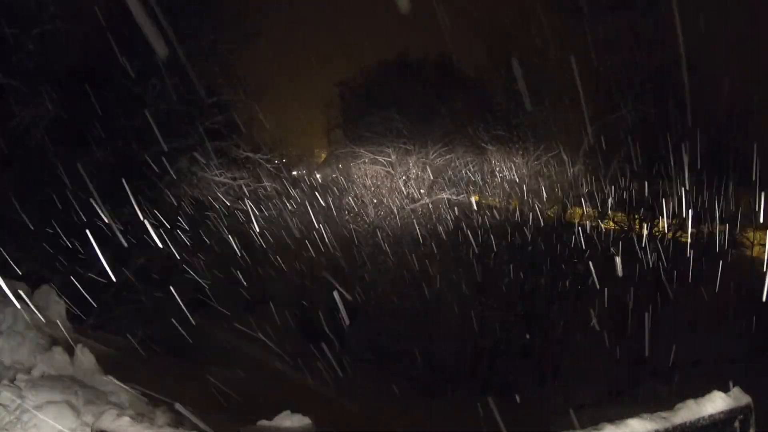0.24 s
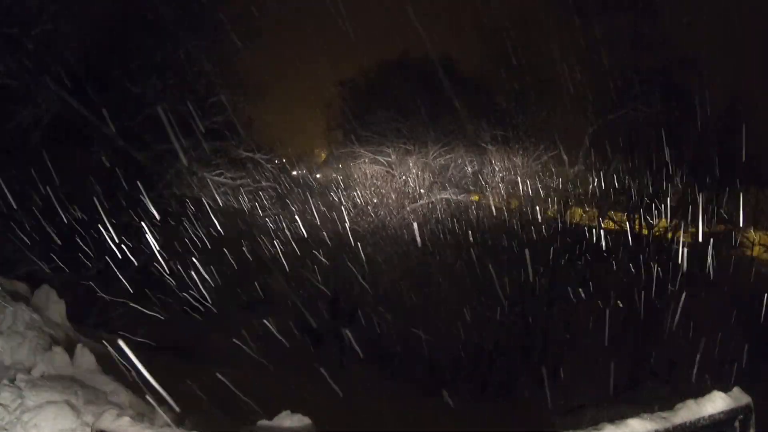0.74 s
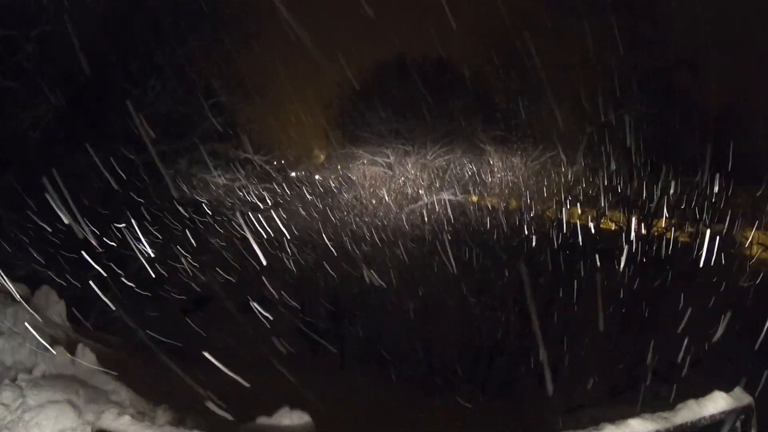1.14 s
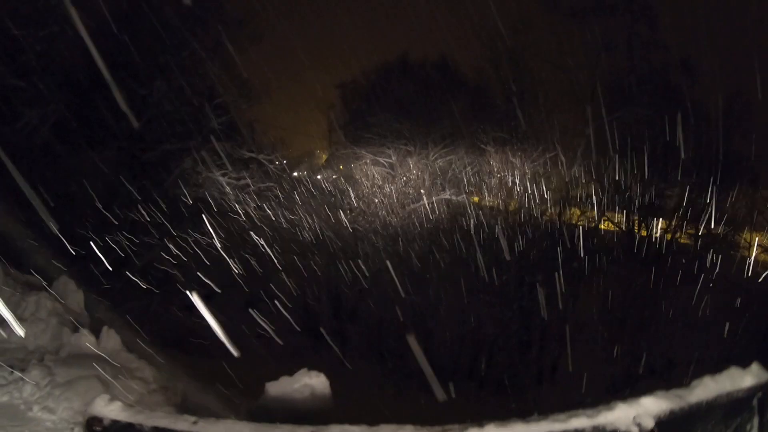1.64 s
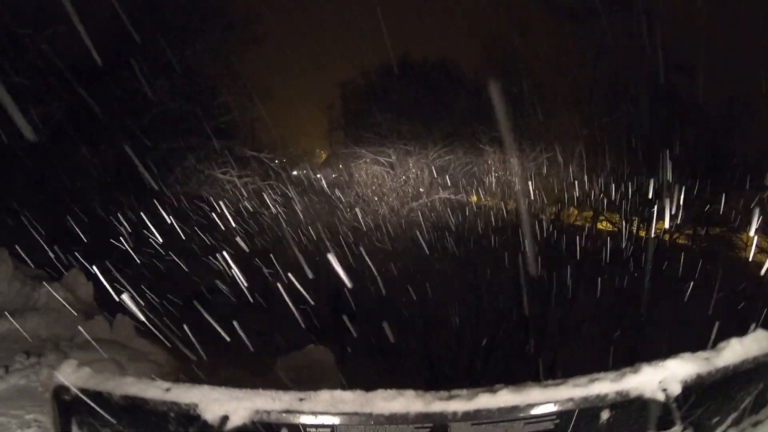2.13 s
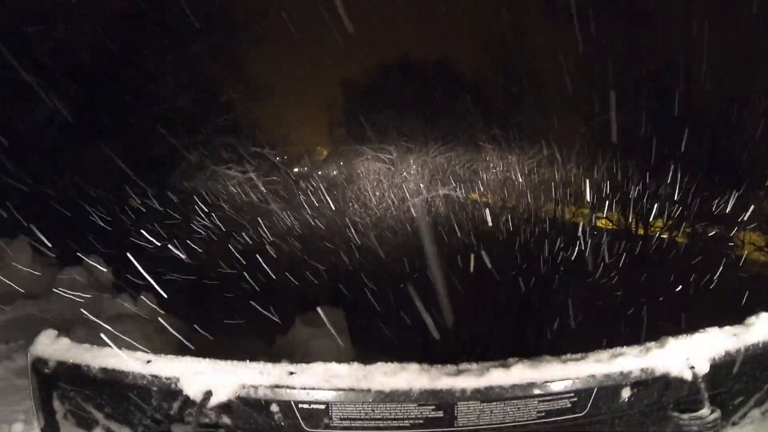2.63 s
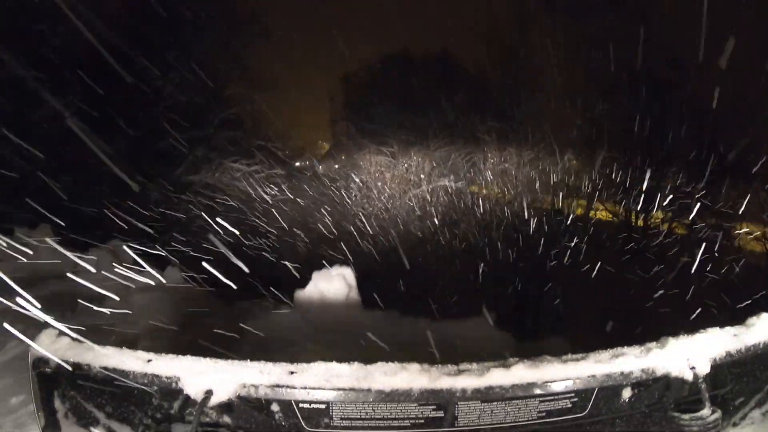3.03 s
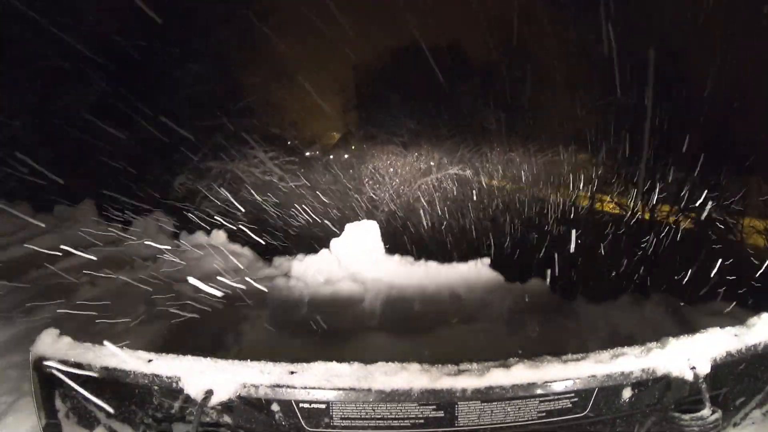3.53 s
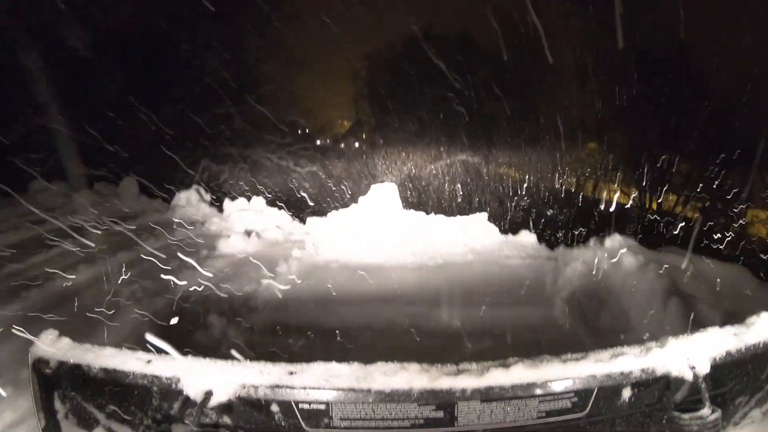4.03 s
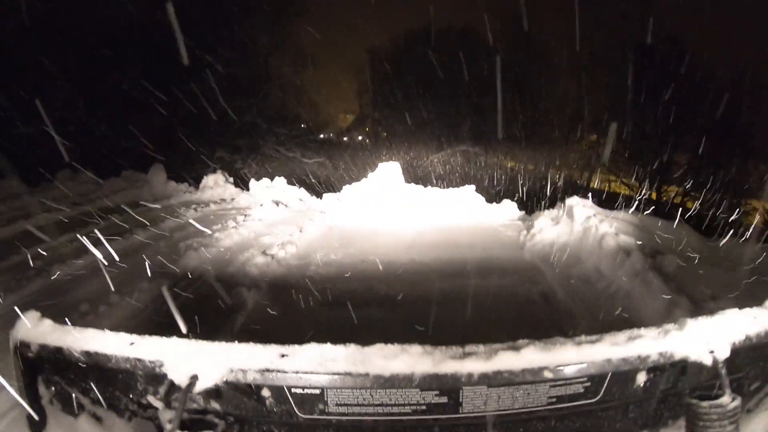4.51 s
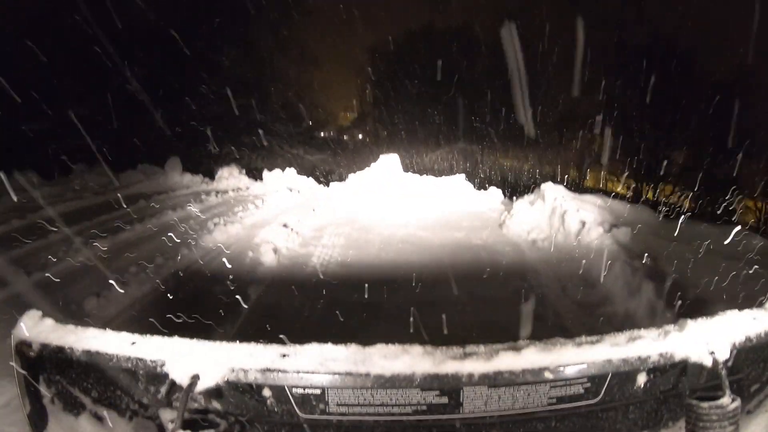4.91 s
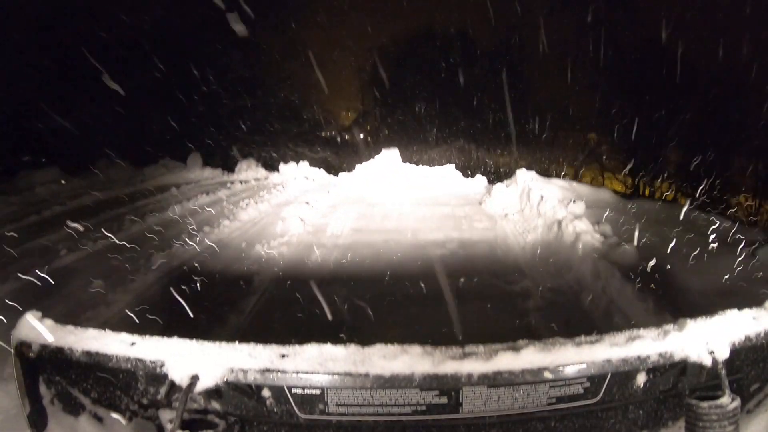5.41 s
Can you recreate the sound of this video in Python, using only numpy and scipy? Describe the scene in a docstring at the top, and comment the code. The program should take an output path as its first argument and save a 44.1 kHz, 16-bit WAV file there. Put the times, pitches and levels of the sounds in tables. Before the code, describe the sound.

Outdoors on a snow plough quad, heard from a boxed-in microphone on the frame: low chugging idle, a cluster of metallic gear knocks, a fluttering winch whine with airy hiss that stops in a clack, dull frame clunks, then quickening engine throb with fizzy rattling and one more short winch burst and clack.

```python
"""A single-cylinder four-stroke quad idles as overtones of its firing rate, then knocks into gear.
An electric winch lifts the plough blade, hissing and whining, until relay and brake clack; clunks follow.
The quad backs away from a snow bank, its rate rising; a loose part buzzes with the crank in two bursts.
During the first the winch lifts and clacks again. Panels rumble and valve gear clatters throughout.
The microphone sits in a closed housing on the frame: strong bass, dull treble."""
import sys
import numpy as np
from scipy import signal
from scipy.fft import rfft, irfft, next_fast_len
from scipy.io import wavfile
from scipy.ndimage import uniform_filter1d, map_coordinates

SR = 44100
rng = np.random.default_rng(int(sys.argv[2]) if len(sys.argv) > 2 else 0)


def master(y):
    """Save y as 16-bit WAV."""
    cut = np.clip(np.atleast_2d(y).T, -1, 1)
    pcm = np.round(cut * 32767)  # scale
    wavfile.write(sys.argv[1], SR, pcm.astype(np.int16))


def decibels_to_gain(level_db):
    """Convert a level in decibels to a linear amplitude gain (20 dB per decade)."""
    exponent = np.asarray(level_db, float) / 20
    return 10 ** exponent


N = 249606
TIME = np.arange(N) / SR

# Engine speed, one firing per cycle [start_s, firings_per_s]
ENGINE_SPEED = [(0, 10.38), (.59, 10.51), (.79, 12.22), (.9, 17.09), (1.06, 16.9), (1.49, 14.42),
                (1.62, 13.48), (1.7, 14.13), (2.72, 14.78), (2.99, 18.25), (3.42, 21.58), (3.62, 21.75),
                (3.96, 23.49), (4.39, 23.34), (4.48, 22.47), (4.91, 23.79), (5.13, 26.25), (5.66, 28.36)]
# Rumble of the panels, before a common lift [start_s, level_db]
RUMBLE_LEVEL = [(0, -44), (.6, -42), (1.15, -37), (1.28, -27.5), (1.395, -36.5), (1.45, -27.5),
                (1.69, -32.5), (2.33, -35.5), (2.61, -32.5), (2.9, -41), (3.4, -38), (3.88, -36),
                (4.35, -45.5), (4.8, -45), (5.1, -41.5), (5.66, -43.5)]
# Spectrum of the panel rumble [pitch_hz, density_db_per_hz]
RUMBLE_SPECTRUM = [(20, -19.5), (50, 14), (120, 6), (165, 1.5), (260, 0.5), (290, -8), (500, -8.5),
                   (800, -35), (3000, -110)]
# Spectrum of the valve-gear clatter [pitch_hz, density_db_per_hz]
CLATTER_SPECTRUM = [(240, -5), (400, -3.5), (620, -4), (1050, -5.5), (1360, -13.5), (1700, -10),
                    (2200, -13.5), (2900, -27), (4100, -21.5), (5800, -23.5), (7000, -38), (8500, -41),
                    (14000, -93.5)]
# Modes of the valve cover, rung when a valve seats [pitch_hz, width_hz, level_db]
COVER_MODES = [(1079, 18, 5), (1520, 220, -3.5), (2080, 210, -4.5), (2530, 210, -10)]
# Bursts of buzz from the loose part [start_s, stop_s, level_db]
BUZZ_BURSTS = [(4.31, 4.55, -47), (4.7, 5.66, -48)]
# Contacts of the loose part in each crank turn; it strikes earlier in every second turn and in the
# first burst [share_turns, level_db, alternate_advance_turns, first_burst_advance_turns]
BUZZ_CONTACTS = [(0.34, -9.5, 0.027, .03), (.48, -18.5, 0.0048, 0.065), (.98, -11.5, 0.044, 0.11)]
# Spectrum of one tick of the loose part [pitch_hz, density_db]
TICK_SPECTRUM = [(1650, -2), (3300, -11.5), (4300, 0.5), (5400, -4), (6200, 3.5), (7000, -10),
                 (8500, -12.5), (9800, -18.5), (12000, -38), (15000, -50.5)]
# Brief dips of the buzz [centre_s, half_length_s, depth_db]
BUZZ_LULLS = [(4.87, 0.0075, -14), (5.268, 0.013, -7.5)]
# Gear-lever knocks and frame clunks, levels before trims; the thud decays more slowly than its t60 by a
# common factor [start_s, crack_level_db, thud_over_crack_db, t60_s, thud_pitch_hz]
BLOWS = [(0.7385, -47, 15.5, 0.17, 1034), (0.797, -45, 16.5, 0.13, 1655), (0.95, -37.5, 10.5, 0.043, 565),
         (1.012, -41, 14, 0.065, 875), (1.19, -42, 3.5, 0.91, 528), (1.229, -32, 7.5, 0.04, 1200),
         (1.268, -39, 19.5, 0.032, 490), (1.285, -21, -4, 0.048, 1820), (1.294, -25, 2, 0.057, 1200),
         (1.306, -32, 3.5, 0.17, 460), (1.338, -23.5, 0, 0.047, 624), (1.345, -29.5, -7, 0.19, 2500),
         (1.377, -46.5, 24, 0.022, 297), (1.408, -25.5, -18, 0.3, 2480), (1.4202, -24.5, 4.5, 0.067, 590),
         (1.429, -41, 13, 0.036, 1780), (1.44, -44, 20, 0.042, 610), (2.5649, -38, 8.5, 0.097, 440),
         (2.579, -35, 0, 0.026, 1490), (2.5935, -33, 12, 0.14, 788), (2.6145, -37.5, 12, 0.06, 1860),
         (2.677, -40, 14, 0.13, 453), (2.7089, -38.5, 11, 0.078, 454), (2.7827, -36, 3.5, 0.055, 1470),
         (2.8668, -44.5, 17, 0.089, 1920), (3.129, -39, -5.5, 0.066, 500), (3.483, -37.5, 2, 0.062, 554),
         (3.7774, -39, -13, 0.19, 484), (3.8419, -35, 9, 0.14, 2090), (4.3508, -23.5, -9, 0.029, 466),
         (4.673, -33.5, 5.5, 0.11, 1880)]
# Spectrum of the bright crack [pitch_hz, density_db_per_hz]
CRACK_SPECTRUM = [(1470, -49.5), (2700, -14.5), (3400, -12.5), (4200, -4.5), (5500, -3.5), (7000, -16),
                  (8300, -22), (9500, -32), (11500, -43), (15000, -68)]
# Spectrum of the dull thud [pitch_hz, density_db_per_hz]
THUD_SPECTRUM = [(80, -39), (220, -14), (450, 4.5), (950, -1.5), (1800, -5.5), (2600, -8.5), (3500, -22.5),
                 (8000, -100)]
# Runs of the winch motor [start_s, stop_s, brush_hiss_level_db]
WINCH_RUNS = [(1.46, 2.48, -43.5), (4.355, 4.55, -48.5)]
# Gear whine swelling and sagging in the first pull, before a small lift [start_s, level_db]
WHINE_LEVEL = [(1.52, -48), (1.56, -39), (1.62, -44), (1.66, -42), (1.75, -37), (1.79, -53), (1.87, -40.5),
               (2.0, -39.5), (2.18, -45.5), (2.36, -39.5), (2.47, -44)]
# Spectrum of the brush hiss [pitch_hz, density_db_per_hz]
HISS_SPECTRUM = [(1650, -24.5), (3000, -18), (3700, -10.5), (4700, -1.5), (6300, 0), (7000, -14.5),
                 (8600, -23.5), (9200, -31), (11000, -39), (14000, -79.5)]
# Modes of the gear housing, for one filter pass [pitch_hz, width_hz, level_db]
HOUSING_MODES = [(943, 63, 0), (2040, 38, -4), (528, 16, 2.5), (1596, 42, -7)]
# Winch gears jolted as the motor starts or its brake bites [start_s, ring_level_db, t60_s]
GEAR_JOLTS = [(1.421, -25, 0.14), (2.491, -17, 0.076), (4.557, -26.5, 0.081)]
# Relay drops out and brake bites, before the mix of the two parts [start_s, level_db, t60_s]
RELAY_CLACKS = [(2.484, -15, 0.058), (4.552, -16, .04)]
# Modes of the relay, for one filter pass [pitch_hz, width_hz, level_db]
RELAY_MODES = [(2680, 460, -16), (4500, 280, -9), (6080, 630, -5.5)]
# Exhaust pipe and frame as excited by each firing, relative [pitch_hz, gain_db]
PIPE_RESPONSE = [(15, -44.5), (30, -23), (52, -8.5), (72, 3.5), (90, -1.5), (113, 4), (128, -2.5),
                 (141, -15.5), (155, -14), (190, -19), (260, -21.5), (330, -29), (600, -58)]
# The same with the throttle shut [pitch_hz, gain_db]
IDLE_PIPE_RESPONSE = [(52, 1.5), (70, -4.5), (90, 3), (105, 2.5), (118, -6.5), (140, -7), (200, -22),
                      (330, -33.5)]
# Group delay of a firing, whose low part arrives first [pitch_hz, delay_s]
GROUP_DELAY = [(30, -0.032), (70, -0.011), (110, -0.001), (300, 0)]
# Exhaust level (95 to 145 Hz) and frame shake at 2, 3 and 4 times the firing rate, before swells
# [firings_per_s, exhaust_level_db, second_shake_db, third_shake_db, fourth_shake_db]
LEVELS_AT_SPEED = [(10.3, -31.5, -59, -40.5, -32), (12.9, -24.5, -46.5, -28.5, -14.5),
                   (15, -28.5, -47, -32, -33), (16.88, -24, -24.5, -25, -26), (18.9, -21.5, -37, -24, -54),
                   (20.7, -23.5, -24.5, -39, -45.5), (21.77, -21, -25, -33, -41),
                   (23.22, -22, -17.5, -36, -26), (26.95, -29, -15, -32.5, -19)]
# Frame shake swelling and sagging over time, at 2 and 4 times the firing rate, in dB added to the
# level at speed [start_s, second_swell_db, fourth_swell_db]
SHAKE_SWELL = [(1, -1.5, -0.5), (1.15, -1, -25), (1.32, 20, -2), (1.45, 15, -16), (1.6, -5, -4),
               (1.72, 4, 3.5), (2.5, -9, -2.5), (2.7, 18, 9.5), (2.9, 3, 4.5), (3.7, 0.5, -11.5),
               (3.95, -1, -6.5), (4.2, 2, -3), (4.47, 5.5, -2), (4.6, -2.5, -4), (5, 0.5, -7)]
# Lag of the second to fourth shakes behind the firing at full load [lag_turns]
SHAKE_LAG = [0.09, 0.14, 0.65]
# Smaller pulse half a cycle after the firing, at middle speeds [firings_per_s, share_of_firing]
INTAKE_AT_SPEED = [(10.8, 0.029), (12.4, 0.44), (15, 0.31), (17, 0.24), (20, 0.015)]


def unit(x):
    """Normalisation to unit rms."""
    return x / np.sqrt(np.mean(x ** 2) + 1e-20)


def along(points, hz):
    """Interpolation of (pitch, value) points on a logarithmic frequency axis."""
    f, value = np.transpose(points)
    return np.interp(np.log(hz + 1), np.log(f + 1), value)


def curves(rows, at=TIME):
    """Linear interpolation of each column after the first, at the given times or speeds."""
    axis, *columns = np.transpose(rows)
    return [np.interp(at, axis, column) for column in columns]


def running(spans, column, edge=0.018):
    """Gating: a gain held through each span, with linear fades of edge seconds outside it."""
    gain = 0
    for row in spans:
        inside = np.minimum(TIME - row[0], row[1] - TIME)
        gain = gain + decibels_to_gain(row[column]) * np.clip(inside / edge + 1, 0, 1)
    return gain


def wobble(rate):
    """Slow random modulation: a smooth curve through rate random knots a second."""
    knots = rng.standard_normal(int(N * rate / SR) + 4)
    return map_coordinates(knots, [TIME * rate])


def filtered(x, response):
    """Linear filtering: the spectrum multiplied by a response of frequency."""
    m = next_fast_len(len(x) + 8192)
    return irfft(rfft(x, m) * response(np.fft.rfftfreq(m, 1 / SR)), m)[:len(x)]


def noise(spectrum, count=N):
    """Spectral shaping: white noise coloured and scaled to unit rms."""
    return unit(filtered(rng.standard_normal(count), lambda hz: decibels_to_gain(along(spectrum, hz))))


def resonant(modes):
    """Modal superposition: damped resonances summed with alternating sign."""
    def response(f):
        total = 0
        for k, (centre, width, db) in enumerate(modes):
            damping = 1j * f * width
            total = total + (-1) ** k * decibels_to_gain(db) * damping / (centre * centre - f * f + damping)
        return total
    return response


def cycles():
    """Phase accumulation: engine cycles done so far, the integral of the firing rate."""
    return np.cumsum(curves(ENGINE_SPEED)[0]) / SR


def frame():
    """Cyclic excitation: panels rumble once and valve gear clatters three times per engine cycle."""
    cycle, rate = cycles(), curves(ENGINE_SPEED)[0]
    rumble_db = curves(RUMBLE_LEVEL)[0] + 6
    # clatter is -42.5 dB with the rumble at -31 dB and 17 firings a second
    clatter_db = -42.5 + 0.31 * (rumble_db + 31.0) + 0.02 * (rate - 17)

    def after(share, life_s):
        """Exponential decay restarted at one share of every cycle."""
        since_s = ((cycle - share) % 1) / rate
        return uniform_filter1d(np.exp(-since_s / life_s), size=200)

    rumble = unit((0.12 + after(0.83, 0.061)) * decibels_to_gain(2.07 * wobble(9))) * noise(RUMBLE_SPECTRUM)
    valves = after(.62, .015) + .5 * after(.15, .01) + .3 * after(.42, .01)
    clatter = unit((1.3 + valves) * decibels_to_gain(1.52 * wobble(25.02))) * noise(CLATTER_SPECTRUM)
    ring = unit(filtered(valves * rng.standard_normal(N), resonant(COVER_MODES)))
    # a faint hum and the ring of the cover stand out only at idle
    idling = 1 / (1 + (rate / 11.3) ** 30)
    hum = decibels_to_gain(-55 + 2 * wobble(8)) * idling * np.sin(2 * np.pi * 68.5 * cycle)
    valve_gear = clatter + (0.11 + 0.5 * idling) * ring
    return decibels_to_gain(rumble_db) * rumble + decibels_to_gain(clatter_db) * valve_gear + hum


def buzz():
    """Repeated impact: a loose part strikes a few uneven ticks per crank turn, each with a fizzy tail."""
    turn = 2 * cycles()  # two crank turns per four-stroke cycle
    turns = np.arange(int(turn[-1]))
    luck = rng.standard_normal((len(turns), len(BUZZ_CONTACTS), 2))
    share, level_db, alternate, advance = np.transpose(BUZZ_CONTACTS)
    first_burst = TIME[np.searchsorted(turn, turns)] < BUZZ_BURSTS[0][1]
    share = share - alternate * (turns % 2)[:, None] - advance * first_burst[:, None]
    strike_turn = turns[:, None] + share + 0.016 * luck[..., 0]
    when = np.interp(strike_turn, turn, np.arange(N)).astype(int)
    hits = np.bincount(when.ravel(), decibels_to_gain(level_db + 1.8 * luck[..., 1]).ravel(), N)
    t = np.arange(SR // 50) / SR
    tail = signal.fftconvolve(hits, decibels_to_gain(-60 * t / .005))[:N]
    strikes = hits + (0.6 * tail + 0.015) * rng.standard_normal(N)
    ticks = unit(filtered(strikes, lambda hz: decibels_to_gain(along(TICK_SPECTRUM, hz))))
    sway_db = .8 * wobble(10)
    for s, half_s, depth_db in BUZZ_LULLS:
        sway_db = sway_db + depth_db * np.exp(-((TIME - s) / half_s) ** 2)
    return running(BUZZ_BURSTS, column=2, edge=0.0033) * decibels_to_gain(sway_db) * ticks


def knocks():
    """Impact and modal decay: a bright, rattling crack over a dull thud that rings at its own pitch."""
    out, t = np.zeros(N + SR), np.arange(SR // 5) / SR
    rise = 1 - np.exp(-t / 0.0015)
    swell = 1 - np.exp(-(t / 0.0013) ** 2)  # the rattle needs a moment to build
    rattle_db = np.pad(1.2 * wobble(250), (0, SR))
    for s, db, low_db, t60, hz in BLOWS:
        start = round(s * SR)
        rattle = rattle_db[start:][:len(t)] * np.minimum(t / 0.0073, 1)
        crack = decibels_to_gain(rattle + 2.5 - 60 * t / t60) * noise(CRACK_SPECTRUM, count=len(t))
        dull = filtered(crack, lambda f: f < 6800)
        crack = dull + (crack - dull) * decibels_to_gain(3 - 60 * t / 0.11)  # the top of the crack dies first
        thud = decibels_to_gain(low_db - 60 * t / (1.35 * t60)) * noise(THUD_SPECTRUM, count=len(t))
        # the short pitched ring is weaker the higher it is
        ring = decibels_to_gain(low_db + 6 - 60 * t / 0.063) * np.sqrt(600 / hz) * np.sin(2 * np.pi * hz * t)
        # the frame booms at 248 Hz under every thud
        boom = decibels_to_gain(low_db + 6 - 60 * t / 0.072) * np.sin(2 * np.pi * 248 * t)
        out[start:][:len(t)] += decibels_to_gain(db - 9.5) * (swell * crack + rise * (thud + ring + boom))
    return out[:N]


def winch():
    """Brush noise, gear-mesh tone and resonance: hiss and fluttering whine, jolted rings, relay clacks."""
    hiss = unit(decibels_to_gain(0.55 * wobble(90) + 0.63 * wobble(300)) * noise(HISS_SPECTRUM))
    housing, gear_hz = resonant(HOUSING_MODES), HOUSING_MODES[0][0]
    grind = unit(filtered(filtered(rng.standard_normal(N), housing), housing))
    # the gear tone wanders in pitch and strength
    tone = np.sin(2 * np.pi * np.cumsum(gear_hz + 19.97 * wobble(22)) / SR)
    whine = unit(unit(decibels_to_gain(5.5 * wobble(35)) * tone) + .8 * grind)
    pull = running([(WHINE_LEVEL[0][0], WHINE_LEVEL[-1][0], 1)], column=2)  # 1 dB lift
    out = running(WINCH_RUNS, column=2) * hiss + decibels_to_gain(curves(WHINE_LEVEL)[0]) * pull * whine
    for s, db, t60 in GEAR_JOLTS:
        t = np.maximum(TIME - s, 0)
        out += decibels_to_gain(db - 60 * t / t60) * (1 - np.exp(-t / 0.0069)) * np.sin(2 * np.pi * gear_hz * t)
    relay = resonant(RELAY_MODES)
    clang = unit(filtered(filtered(rng.standard_normal(N), relay), relay))
    for s, db, t60 in RELAY_CLACKS:
        t = np.maximum(TIME - s, 0)
        envelope = decibels_to_gain(db - 60 * t / t60) * (1 - np.exp(-(t / 0.003) ** 2))
        out += envelope * (0.55 * clang + 0.25 * noise(CRACK_SPECTRUM))
    return out


def engine():
    """Harmonic synthesis: firings as overtones through the pipe; frame shake sets the second to fourth."""
    rate, cycle = curves(ENGINE_SPEED)[0], cycles()
    exhaust_db, second_db, third_db, fourth_db = curves(LEVELS_AT_SPEED, rate)
    second_swell_db, fourth_swell_db = curves(SHAKE_SWELL)
    shake_db = [second_db + second_swell_db, third_db, fourth_db + fourth_swell_db]
    intake, = curves(INTAKE_AT_SPEED, rate)
    load = np.clip((rate - 10.6) / 8, 0, 1)
    shut = np.clip((12 - rate) / 1.4, 0, 1)  # throttle closed at low speed
    hz = [k * rate for k in range(1, 27)]

    sizes = []
    for k, f in enumerate(hz):
        pipe_db = (1 - shut) * along(PIPE_RESPONSE, f) + shut * along(IDLE_PIPE_RESPONSE, f)
        # the half-cycle pulse strengthens even multiples of the firing rate and weakens odd ones
        sizes.append(decibels_to_gain(pipe_db) * (1 - intake * (-1) ** k))
    band = sum(g ** 2 * ((f > 95) & (f < 145)) for g, f in zip(sizes[4:], hz[4:]))
    scale = decibels_to_gain(exhaust_db) / np.sqrt(uniform_filter1d(band, size=SR // 8))
    # upper overtones thin out as the panels calm and at top speed
    calm_db = 0.99 * load * np.minimum(curves(RUMBLE_LEVEL)[0] + 37, 0)
    thin_db = calm_db - 6.5 * np.maximum(rate - 24, 0)
    for k, f in enumerate(hz):
        muffling = decibels_to_gain(thin_db * np.clip((f - 143) / 12, 0, 1))
        sizes[k] = sizes[k] * scale * muffling * decibels_to_gain(1.55 * (1 - 0.87 * shut) * wobble(7))

    grid = np.arange(800.)
    lag = np.cumsum(along(GROUP_DELAY, grid))  # delay summed over frequency gives phase in turns
    # the pulse changes shape with load
    turns = [(k + 1) * cycle - np.interp(f, grid, lag) - .44 - .46 * load for k, f in enumerate(hz)]
    loose = np.clip((rate - 17) / 3, 0, 1)  # at speed the overtones above the fifth no longer line up
    turns[5:] = [u + loose * rng.uniform(-.5, .5) for u in turns[5:]]
    for k, (db, late) in enumerate(zip(shake_db, SHAKE_LAG), start=1):
        sizes[k], turns[k] = decibels_to_gain(db), turns[k] - late * load
    return np.sqrt(2) * sum(g * np.cos(2 * np.pi * u) for g, u in zip(sizes, turns))


def scene():
    """Superposition: all sources added, close to the microphone and dry."""
    return (frame() + buzz() + knocks() + winch() + engine())[None]


def roll_off(x):
    """The treble ends steeply here."""
    return signal.sosfilt(signal.butter(12, 15700, fs=SR, output="sos"), x)


def record(dry):
    """High-pass response: the microphone drops the deepest bass, below about 22 Hz."""
    mix = filtered(dry[0], lambda hz: 1 / (1 + (22 / (hz + 1)) ** 6))[None]
    return roll_off(mix)


dry = scene()
out = record(dry)
master(out)
```